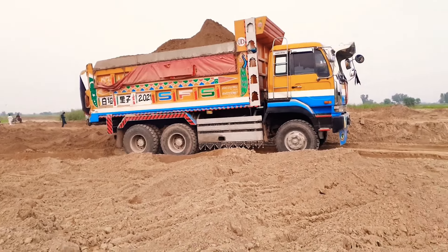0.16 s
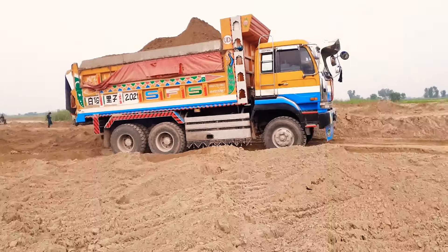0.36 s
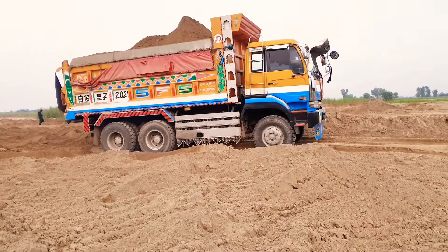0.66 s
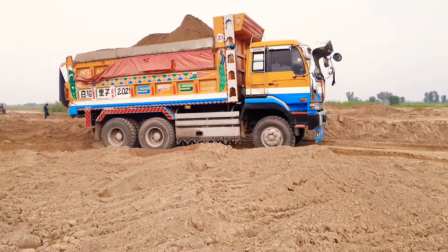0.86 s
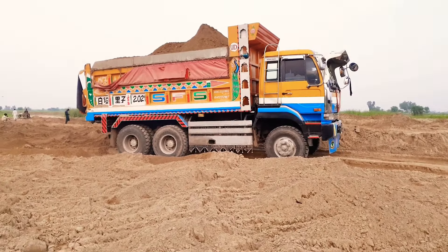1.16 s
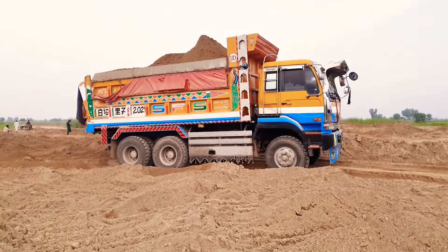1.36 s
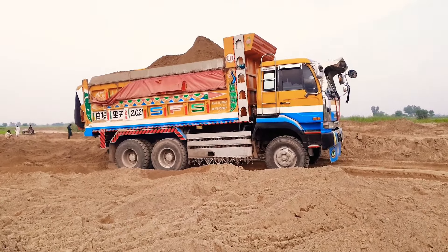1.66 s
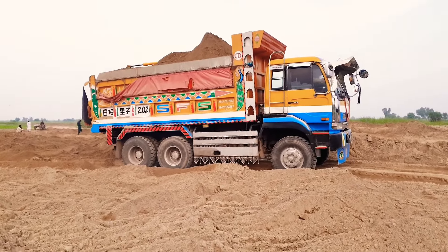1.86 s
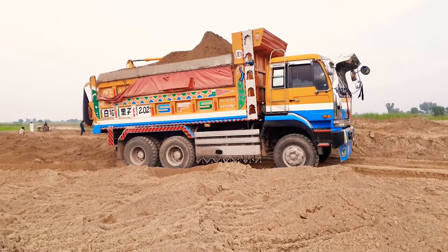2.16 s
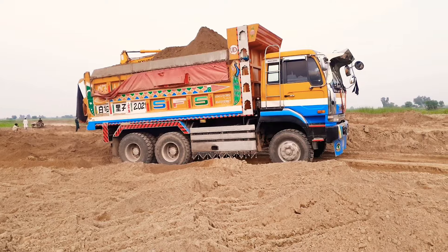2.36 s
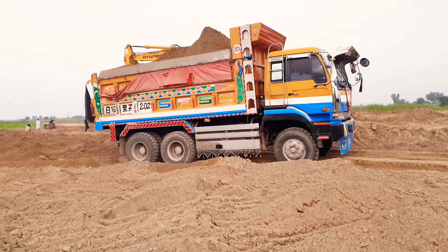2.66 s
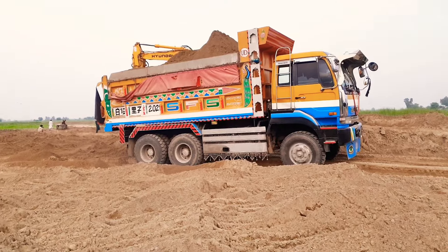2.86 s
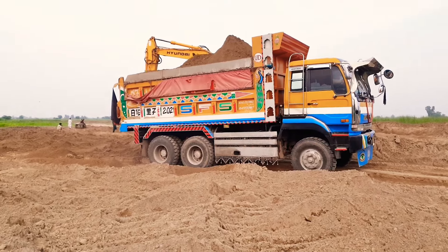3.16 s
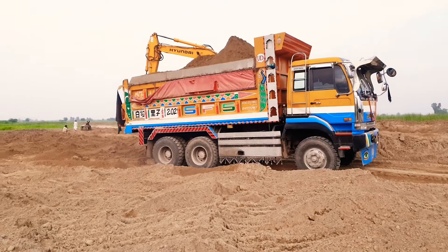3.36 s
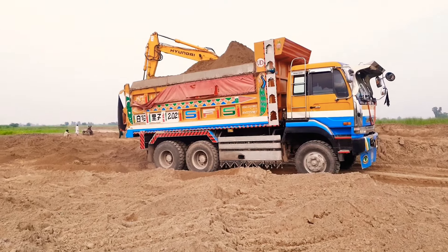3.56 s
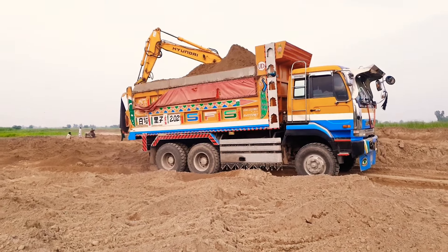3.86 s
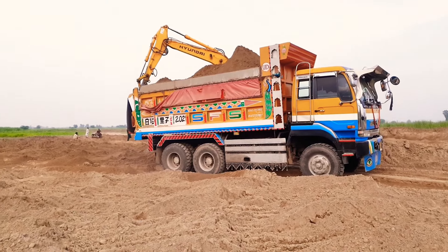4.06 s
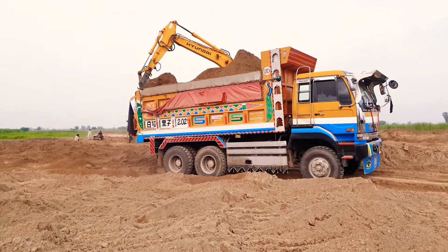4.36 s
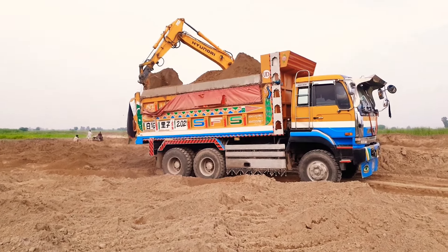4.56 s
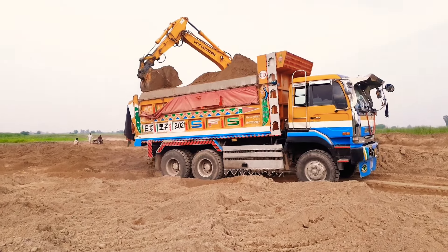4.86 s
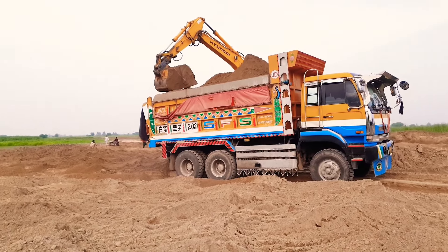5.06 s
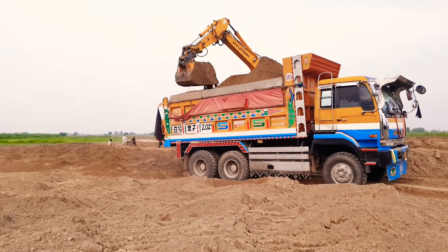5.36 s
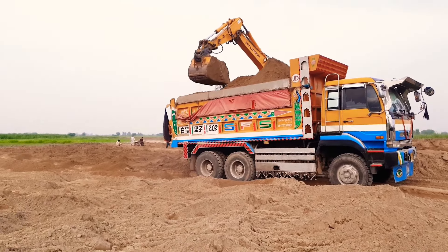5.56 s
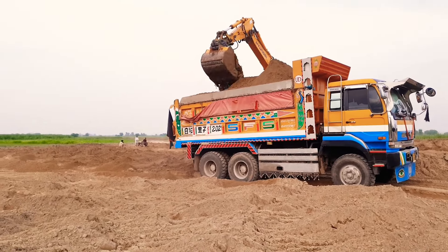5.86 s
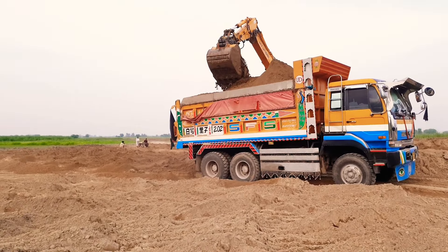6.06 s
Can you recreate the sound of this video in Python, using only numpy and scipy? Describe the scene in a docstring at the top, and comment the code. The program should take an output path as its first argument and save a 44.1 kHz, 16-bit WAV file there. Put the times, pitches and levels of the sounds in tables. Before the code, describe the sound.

At an open earth pit, a dump truck's diesel knocks at idle over an excavator's steady low drone. A few stones click on steel and a small bird chirps faintly to the right. About halfway, wind starts buffeting the microphone and the drone sinks. Hydraulic oil hisses as the boom swings, the pump sings briefly, and near the end the steel bucket clanks once.

```python
"""From the start, a dump truck's V8 diesel knocks at idle in an earth pit; an excavator's exhaust drones.
Stones click on steel, and from 0.8 s a small bird chirps to the right.
From 3.2 s wind buffets the microphone and the drone sinks. At 3.5-4.9 s the boom swings: oil hisses
through its valve, the pump sings, a thin whine follows. At 5.5 s the bucket clanks against its stop."""
import sys
import numpy as np
from scipy import signal
from scipy.fft import rfft, irfft
from scipy.io import wavfile
from scipy.ndimage import uniform_filter1d

SR = 44100
rng = np.random.default_rng(int(sys.argv[2]) if len(sys.argv) > 2 else 0)


def log_audio(samples):
    """Write samples as a 16-bit WAV file to the path given in sys.argv[1]."""
    # one column per channel
    frames = np.atleast_2d(samples).T
    # limit to full scale, then quantise
    limited = np.clip(frames, -1, 1)
    pcm = np.round(limited * 32767).astype(np.int16)
    wavfile.write(sys.argv[1], SR, pcm)


N = 274302
TIME_S = np.arange(N) / SR
FREQS_HZ = np.maximum(np.fft.rfftfreq(N, 1 / SR), 1)

# truck cylinders in firing order: delay/s, relative knock/dB, relative crack/dB
CYLINDERS = [(-0.011, 2, -31), (-.0015, 1, 0.5), (-0.0012, 1.5, -20), (-.005, 0.5, 10.5), (-0.0054, -4, 5),
             (-0.0056, -1.5, -9), (-0.0091, 4.5, 2.5), (-0.009, -6.5, -7)]
# cylinder head resonances: f/Hz, width/Hz, relative level/dB
HEAD_MODES = [(1132, 47, 7.5), (1412, 81, 6), (1726, 43, 7.5), (2048, 164, -1.5), (2254, 127, 2),
              (2600, 205, -2.5), (2866, 220, -2), (3235, 120, -11), (3580, 65, -19)]
# engine block at idle: t/s, level/dB
BLOCK_CURVE = [(0, -44), (.75, -46.5), (1.6, -46.5), (2.1, -44.5), (3.2, -45), (5.1, -46), (6.22, -45)]
# truck noise spectra: f/Hz, relative level/dB
KNOCK_SPECTRUM = [(600, -21.5), (1050, 3), (1320, -23), (1500, 7), (1720, -1), (1920, -4), (2080, -7),
                  (2320, -6), (2580, -14), (2900, -5), (3400, -13), (4500, -14), (6000, -20.5), (7400, -23),
                  (8600, -31.5)]
BLOCK_SPECTRUM = [(300, -7.5), (480, -10), (590, -2), (690, -1), (830, 0), (980, -5), (1150, -9.5),
                  (1400, -12), (2200, -27.5)]
RUMBLE_SPECTRUM = [(20, -28), (40, 2), (65, 4.5), (115, 1), (160, -5), (230, -7.5), (310, -7), (400, -12.5),
                   (520, -22), (900, -48)]
# excavator firing rate, the governor hunts once: t/s, f/Hz
EXHAUST_PITCH = [(0, 74.12), (.85, 74.15), (1.12, 75.86), (1.36, 72.8), (1.62, 74.8), (3.3, 74.52),
                 (4.2, 75.4), (6.22, 74.1)]
# exhaust note before wind masking: t/s, level/dB
EXHAUST_CURVE = [(0, -21), (1.0, -21.5), (1.2, -24.5), (1.45, -22), (2.4, -22.5), (3.9, -25.5), (4.25, -34),
                 (5.1, -31.5), (6.22, -34.5)]
# six-cylinder exhaust overtones: multiple of crank speed, level/dB
EXHAUST_ORDERS = [(2, -54), (2.5, -50), (5, -51.5), (6, -61.5), (8, -57.5), (9, -58), (10, -60.5),
                  (11, -58.5), (12, -55.5), (16, -67)]
# machinery hums: f/Hz, width/Hz, level/dB
HUMS = [(37, 1.5, -68.5), (103.3, 2.1, -39), (231.1, 4.4, -51)]
# valve hiss: f/Hz, relative level/dB
OIL_SPECTRUM = [(1200, -19), (2200, 9), (3500, -1), (4800, -2.5), (6300, -3.5), (7600, -8.5), (8400, -22),
                (11000, -17), (16000, -29)]
# bucket contacts with its stop: t/s, relative level/dB
CONTACTS = [(5.546, -23.5), (5.5527, -19), (5.5562, -18.5), (5.5655, -29), (5.578, -34)]
# bucket modes: f/Hz, relative level/dB, t60/s
BUCKET_MODES = [(233.5, 3, 0.1), (330.6, -6, 0.227), (1066, -12, 0.16), (1243, -14, 0.22), (1305, -6, 0.14),
                (1327, -19, 0.12), (1690, -11, 0.12), (1710, -20, 0.28), (1780, -8, 0.079),
                (1890, -15, 0.1), (2240, -24, 0.27), (2380, -21, 0.21), (2420, -13, 0.077),
                (2840, -26, 0.16), (3030, -30, 0.15), (3830, -28, 0.094)]
# bucket plate crash: f/Hz, relative level/dB
PLATE_SPECTRUM = [(100, -8), (170, 5), (330, 0), (480, -4), (800, -4.5), (1200, 4), (1800, -1), (2450, -14),
                  (3000, -12), (3400, -40), (4000, -22.5), (6500, -43), (9000, -42), (15000, -38)]
# struck steel resonances: f/Hz, width/Hz, relative level/dB
STEEL_MODES = [(1390, 140, 2.5), (1750, 94, -2), (2286, 170, 5), (2910, 210, 0), (3550, 86, 3.5),
               (5660, 810, -12.5), (6120, 370, -11)]
# stones and clods on steel: t/s, level/dB, t60/s
STONE_HITS = [(0.324, -50, 0.12), (1.008, -39.5, 0.014), (1.146, -53, 0.035), (1.24, -50, 0.069),
              (1.764, -46, 0.023), (2.136, -46, 0.11), (2.149, -39.5, 0.11), (2.274, -47.5, 0.1),
              (3.889, -46, 0.14), (6.061, -47, 0.028)]
# gusts on the microphone: t/s, width/s, level/dB, left-right/dB
GUSTS = [(3.35, 0.078, -33, -1), (3.74, 0.12, -32.5, 4), (4.19, .075, -29.5, 10), (4.65, 0.05, -26.5, -7),
         (4.855, 0.14, -24, 2.5), (4.955, 0.032, -21.5, -1), (5.075, 0.075, -27, 4),
         (5.17, 0.057, -31.5, 3), (5.36, 0.088, -33, 2), (5.51, 0.078, -33, 6), (5.745, 0.028, -31.5, 8),
         (5.875, 0.053, -28, -1), (5.995, 0.071, -25, 4)]
# wind spectra: f/Hz, relative level/dB
EDDY_SPECTRUM = [(20, -1), (42, -5.5), (70, 7), (110, -0.5), (160, -9), (250, -19), (400, -32.5),
                 (900, -39.5)]
FLUTTER_SPECTRUM = [(110, -4), (170, 7), (300, 1), (480, -25.5), (680, -13), (1100, -39)]
# bird runs of arched notes: t/s, note count, note length/s, top f/Hz, level/dB
BIRD_RUNS = [(1.974, 1, .087, 3260, -56), (3.576, 3, 0.016, 3760, -47), (3.65, 5, .0145, 3210, -41.5),
             (5.724, 1, 0.062, 3290, -59)]
# bird slurs: t/s, length/s, start f/Hz, end f/Hz, level/dB
BIRD_SLURS = [(.771, 0.02, 4780, 5040, -63), (1.681, .07, 3180, 3300, -60.5), (2.555, .02, 5400, 5090, -69),
              (2.834, 0.017, 5350, 5050, -65), (3.6365, 0.0091, 5760, 2700, -43),
              (3.719, 0.019, 2400, 2320, -50)]
# hiss at each microphone port: f/Hz, relative level/dB
HISS_LEFT = [(2000, -0.5), (5000, -6.5), (8300, -14.5), (9400, -6.5), (10600, -6), (12000, -15.5),
             (16000, -29)]
HISS_RIGHT = [(2000, 10), (5000, -0.5), (7600, 3.5), (8500, -2), (9400, 3), (12000, 3.5), (16000, 1)]
# machine noise at the two ports: f/Hz, correlation, left-right/dB
PORTS = [(58.7, 0.86, 14), (201, 1, -7), (397, 0.73, -1), (775, 1, -3), (1240, 0, -1.5), (2020, 0.65, -2.5),
         (2980, 0.2, -2.5), (4550, 0, -3.5), (7000, 0.25, -9), (15000, 0.3, -6)]

TRUCK_FIRING_HZ = 30.6
CRACK_DB, KNOCK_DB, RUMBLE_DB = -59.5, -53.5, -38
CRACK_LIFT_DB, KNOCK_LIFT_DB, BLOCK_LIFT_DB = 4, 1, 1.7  # during the swing
GUST_MASK_DB = -39  # wind level that halves the exhaust note's power
SWING_START_S, SWING_END_S, VALVE_OPEN_S, VALVE_SHUT_S = 3.545, 4.905, 0.031, 0.049
SPURT_S, SPURT_FADE_S, SPURT_DB = 0.17, 0.05, -56
OIL_DB, OIL_EASE_DB_PER_S = -62.5, -1.7
PUMP_HZ, PUMP_DB, PUMP_S, PUMP_WIDTH_S = 674, -45, 4.87, 0.31
WHINE_HZ, WHINE_WIDTH_HZ, WHINE_RISE_S, WHINE_DB = 4540, 140, 0.74, -75
BREEZE_START_S, BREEZE_RISE_S, BREEZE_DB, CALM_DB, BREEZE_PAN_DB = 3.18, 1.3, -39.5, -54.5, -2.5
ARCH_DROP, RUN_TAPER_DB = 0.23, 5  # pitch share lost at a note's ends; level lost at a run's ends
LULL_S, LULL_WIDTH_S, LULL_DB = 5.79, 0.08, -10
CUTOFF_HZ = 15680


def truck():
    """Each firing cracks in the head, then knocks and swells in the block, over a low rumble."""
    effort = swing()
    _, cylinder_db, crack_db = np.transpose(CYLINDERS)
    head = resonances(HEAD_MODES)
    snaps = firings(crack_db, rise_s=0.0004, t60_s=0.065, scatter_db=1.2)
    crack = from_db(CRACK_DB + CRACK_LIFT_DB * effort) * snaps * head
    metal = from_db(-3.5) * machine_noise(KNOCK_SPECTRUM, repeat=0.25) + from_db(-4) * head
    knock_gain = from_db(KNOCK_DB + KNOCK_LIFT_DB * effort + 1.15 * drift(110))
    knock = knock_gain * firings(cylinder_db, rise_s=0.0035, t60_s=0.25, scatter_db=0.5) * metal
    block_gain = from_db(in_time(BLOCK_CURVE) + BLOCK_LIFT_DB * effort + 0.7 * drift(70))
    swells = firings(0.32 * cylinder_db, rise_s=0.003, t60_s=0.47, scatter_db=0.4)
    block = block_gain * swells * machine_noise(BLOCK_SPECTRUM, repeat=0.48)
    rumble = from_db(RUMBLE_DB) * lull() * machine_noise(RUMBLE_SPECTRUM, repeat=0.63)
    return crack + knock + block + rumble


def firings(cylinder_db, rise_s, t60_s, scatter_db):
    """Truck firing envelope, rms 1: each cylinder has its own delay and strength, plus scatter."""
    number = np.arange(int(TIME_S[-1] * TRUCK_FIRING_HZ) + 1)
    cylinder = number % len(CYLINDERS)
    jitter, scatter = rng.standard_normal((len(number), 2)).T
    onset_s = number / TRUCK_FIRING_HZ + np.array(CYLINDERS)[cylinder, 0] + 0.0008 * jitter
    onsets = np.clip(onset_s * SR, 0, N - 1).astype(int)
    kicks = np.zeros(N)
    kicks[onsets] = from_db(cylinder_db[cylinder] + scatter_db * scatter)
    return rms_one(signal.fftconvolve(kicks, impact(0, rise_s, t60_s)[:SR // 2])[:N])


def excavator():
    """The muffler passes mainly the firing note, which sinks in gusts; overtones and hums waver."""
    phase = 2 * np.pi * np.cumsum(in_time(EXHAUST_PITCH)) / SR
    crank = phase / 3  # three firings a turn
    port_rad = np.array([[0.25], [0]])
    wind_db, _ = airflow()
    masking = 1 / np.sqrt(1 + from_db(wind_db - GUST_MASK_DB) ** 2)
    note = from_db(in_time(EXHAUST_CURVE) + 1.1 * drift(1.3)) * masking * np.sin(phase + port_rad)
    overtones = sum(from_db(db + 2 * drift(3)) * np.sin(order * crank + 0.3 * drift(2))
                    for order, db in EXHAUST_ORDERS)
    hums = sum(from_db(db + 2.04 * drift(1.2)) * tone(hz, 0.92 * drift(width_hz))
               for hz, width_hz, db in HUMS)
    return np.sqrt(2) * lull() * (note + overtones + hums) * pan(-1.8)


def hydraulics():
    """Oil spurts through the valve, then eases; the loaded pump sings; a thin whine remains."""
    spurt = from_db(SPURT_DB) * (1 - ramp(SWING_START_S + SPURT_S, SPURT_FADE_S))
    flow = from_db(OIL_DB + OIL_EASE_DB_PER_S * (TIME_S - SWING_START_S))
    flutter = from_db(2.3 * drift(30))
    hiss = swing() * np.hypot(flow, spurt) * flutter * machine_noise(OIL_SPECTRUM) * pan(-16.5)
    pump_gain = from_db(PUMP_DB + 2.8 * drift(30)) * bump(PUMP_S, PUMP_WIDTH_S)
    pump = pump_gain * tone(PUMP_HZ, 0.98 * drift(25)) * pan(-3)
    whine_gain = from_db(WHINE_DB) * ramp(SWING_END_S, WHINE_RISE_S)
    return hiss + pump + whine_gain * resonances([(WHINE_HZ, WHINE_WIDTH_HZ, 0)])


def swing():
    """Boom valve opening, 0-1."""
    return ramp(SWING_START_S, VALVE_OPEN_S) * (1 - ramp(SWING_END_S, VALVE_SHUT_S))


def bucket():
    """A sharp touch and a quick run of contacts ring the modes over a crash; the pit answers faintly."""
    ring = np.zeros((2, N))
    for hz, mode_db, t60_s in BUCKET_MODES:
        power = sum((from_db(db + mode_db - 5) * impact(t_s, 0.0006, t60_s)) ** 2
                    for t_s, db in CONTACTS)
        port_rad = rng.normal(0, 1, (2, 1)) * min(hz / 1500, 1) + rng.uniform(0, 2 * np.pi)
        ring += np.sqrt(power) * tone(hz, port_rad)
    crash_power = 0
    for t_s, db in CONTACTS:
        direct = impact(t_s, rise_s=0.00083, t60_s=0.069)
        pit_echo = from_db(-15.5) * impact(t_s, rise_s=0.017, t60_s=0.48)
        crash_power += (from_db(db - 6) * (direct + pit_echo)) ** 2
    touch = from_db(-38.5) * impact(CONTACTS[0][0], 0.0004, 0.059) * resonances(STEEL_MODES)
    crash = np.sqrt(crash_power) * machine_noise(PLATE_SPECTRUM)
    return (ring + crash + touch) * pan(-0.92)


def stones():
    """Gritty clicks ring briefly in the steel."""
    clicks = sum(from_db(db) * impact(t_s, 0.00027, t60_s) for t_s, db, t60_s in STONE_HITS)
    return clicks * resonances(STEEL_MODES) * pan(-2.5)


def wind():
    """Low eddies, mostly separate at each port; the hardest gusts also flutter higher up."""
    wind_db, side_db = airflow()
    eddies = colour(rng.standard_normal((2, N)) + 0.5 * rng.standard_normal(N), EDDY_SPECTRUM)
    eddy_rms = np.sqrt(uniform_filter1d(np.mean(eddies ** 2, axis=0), size=2600) + 1e-6)
    flutter_gain = from_db(wind_db - wind_db.max() - 10.5)
    flutter = flutter_gain * colour(rng.standard_normal((2, N)), FLUTTER_SPECTRUM)
    return from_db(wind_db + 2.56 * drift(30)) * (eddies / eddy_rms + flutter) * pan(side_db)


def airflow():
    """Breeze and gusts add in power: level/dB, power-weighted left-right/dB."""
    breeze = from_db(BREEZE_DB) * ramp(BREEZE_START_S, BREEZE_RISE_S) * lull()
    power = (from_db(CALM_DB) + breeze) ** 2
    side = power * BREEZE_PAN_DB
    for t_s, width_s, db, side_db in GUSTS:
        gust = from_db(db) ** 2 * bump(t_s, width_s)
        power += gust
        side += gust * side_db
    return 10 * np.log10(power), side / power


def bird():
    """Short whistles; loud ones under 4 kHz gain an octave, and the ground scatters them all."""
    song = np.zeros(N)
    tremor = 1 + 0.012 * drift(350)
    for t_s, pitch_hz, db in bird_notes():
        start = round(t_s * SR)
        span = slice(start, start + len(pitch_hz))
        progress = np.linspace(0, 1, len(pitch_hz))
        envelope = from_db(db) * np.sqrt(4 * progress * (1 - progress))
        phase = 2 * np.pi * np.cumsum(pitch_hz * tremor[span]) / SR
        octave = from_db(min(-11, db + 32)) * (pitch_hz < 4000)
        song[span] += envelope * (np.sin(phase) + octave * np.sin(2 * phase))
    echoes = rng.standard_normal((2, SR // 4)) * impact(0, rise_s=0.0019, t60_s=0.11)[:SR // 4]
    scattered = signal.fftconvolve(song[None], echoes / np.linalg.norm(echoes[0]))[:, :N]
    return (song * from_db(2.9 * drift(300)) + from_db(-9) * scattered) * pan(-17.5)


def bird_notes():
    """Arches in runs that swell and fade, then accelerating slurs: t/s, contour f/Hz, level/dB."""
    for t_s, count, length_s, top_hz, db in BIRD_RUNS:
        count = round(count)
        arch_hz = top_hz * (1 - ARCH_DROP * np.linspace(-1, 1, round(length_s * SR)) ** 2)
        for k in range(count):
            yield t_s + k * length_s, arch_hz, db - RUN_TAPER_DB * ((2 * k + 1) / count - 1) ** 2
    for t_s, length_s, start_hz, end_hz, db in BIRD_SLURS:
        yield t_s, start_hz + (end_hz - start_hz) * np.linspace(0, 1, round(length_s * SR)) ** 2, db


def air():
    """Faint flickering hiss, coloured differently by each port."""
    left = from_db(-61.5) * colour(rng.standard_normal(N), HISS_LEFT)
    right = from_db(-60.5) * colour(rng.standard_normal(N), HISS_RIGHT)
    flicker = from_db(1.1 * drift(45) + 0.6 * drift(8))
    return np.array([left, right]) * flicker


def lull():
    """Low-end gain through its brief dip."""
    return from_db(LULL_DB * bump(LULL_S, LULL_WIDTH_S))


def machine_noise(spectrum, repeat=0):
    """Stereo noise at the ports, rms 1; the power share `repeat` recurs each truck engine cycle."""
    cycle = round(len(CYLINDERS) / TRUCK_FIRING_HZ * SR)
    white = rng.standard_normal((2, N))
    looped = rng.standard_normal((2, cycle))[:, np.arange(N) % cycle]
    mid, side = rfft(np.sqrt(1 - repeat) * white + np.sqrt(repeat) * looped)
    correlation, balance_db = in_frequency(PORTS)
    ports = np.sqrt(1 + correlation) * mid + np.sqrt(1 - correlation) * side * [[1], [-1]]
    return colour(irfft(ports * pan(balance_db), N), spectrum)


def resonances(modes):
    """Stereo noise ringing in resonances whose mix drifts; rms 1."""
    drive = machine_noise([(300, 0), (8000, 0)], repeat=0.6)
    mix = 0
    for k, (hz, width_hz, db) in enumerate(modes):
        radius = np.exp(-np.pi * abs(width_hz) / SR)
        feedback = [1, -2 * radius * np.cos(2 * np.pi * hz / SR), radius ** 2]
        ring = (1 - radius ** 2) * signal.lfilter([1, 0, -1], feedback, drive)
        mix += (-1) ** k * from_db(db + 2 * drift(27)) * ring
    return rms_one(mix)


def colour(noise, spectrum):
    """Shape noise to a spectrum, rolled off past both ends; rms 1."""
    low_hz, high_hz = spectrum[0][0] / 2, spectrum[-1][0] * 2
    skirts = 1 / np.sqrt((1 + (FREQS_HZ / high_hz) ** 10) * (1 + (low_hz / FREQS_HZ) ** 10))
    return rms_one(irfft(rfft(noise) * from_db(in_frequency(spectrum)[0]) * skirts, N))


def drift(rate_hz):
    """Smooth random wander; rms 1."""
    return rms_one(irfft(rfft(rng.standard_normal(N)) / (1 + (FREQS_HZ / rate_hz) ** 2), N))


def tone(hz, phase_rad):
    """Sine with a phase offset."""
    return np.sin(2 * np.pi * hz * TIME_S + phase_rad)


def impact(t_s, rise_s, t60_s):
    """Envelope of one blow."""
    age_s = np.clip(TIME_S - t_s, 0, 2)
    return (1 - np.exp(-age_s / rise_s)) * from_db(-60 * age_s / t60_s)


def ramp(start_s, length_s):
    """Linear rise, 0-1."""
    return np.clip((TIME_S - start_s) / length_s, 0, 1)


def bump(centre_s, width_s):
    """Gaussian swell, peak 1; width at half height."""
    return 0.5 ** np.minimum((2 * (TIME_S - centre_s) / width_s) ** 2, 60)


def in_time(rows):
    """Curve value at every sample."""
    return np.interp(TIME_S, *np.transpose(rows))


def in_frequency(rows):
    """Spectrum columns at every bin."""
    hz, *columns = np.transpose(rows)
    return [np.interp(np.log(FREQS_HZ), np.log(hz), column) for column in columns]


def pan(side_db):
    """Channel gains for a left-right difference."""
    return from_db(np.array([[0.5], [-0.5]]) * side_db)


def from_db(db):
    """Decibels to gain."""
    return 10 ** (np.asarray(db) / 20)


def rms_one(x):
    """Scale to unit power."""
    return x / np.sqrt(np.mean(x ** 2) + 1e-20)


def scene():
    """All sources at the edge of the pit."""
    return truck() + excavator() + hydraulics() + bucket() + stones() + bird() + wind() + air()


def record(dry):
    """Steep elliptic low-pass."""
    return signal.sosfilt(signal.ellip(12, 0.1, 80, CUTOFF_HZ, fs=SR, output="sos"), dry)


dry = scene()
out = record(dry)
log_audio(out)
```